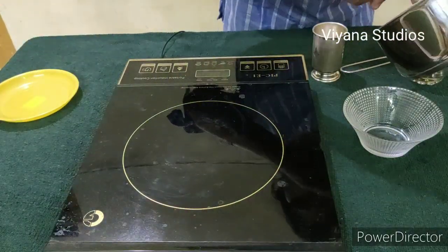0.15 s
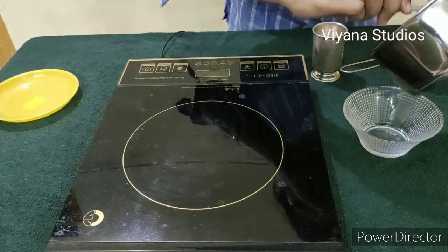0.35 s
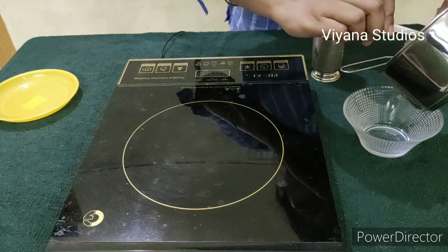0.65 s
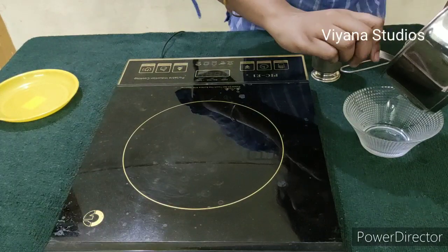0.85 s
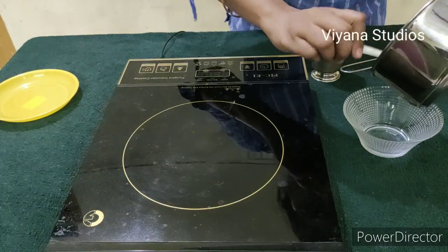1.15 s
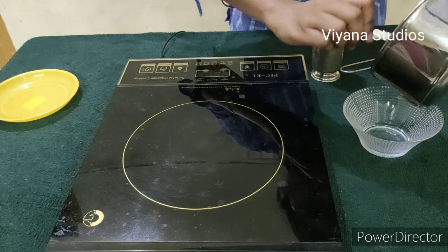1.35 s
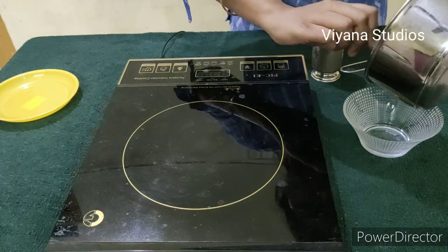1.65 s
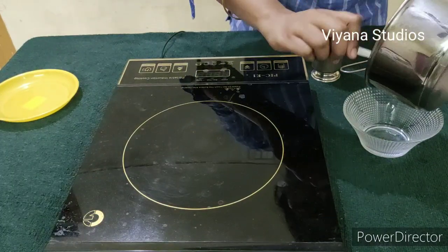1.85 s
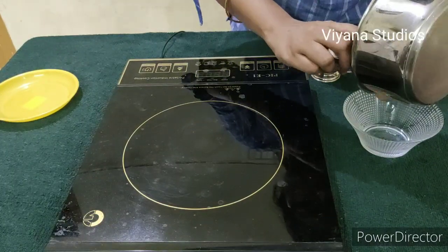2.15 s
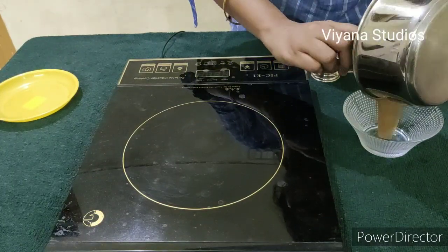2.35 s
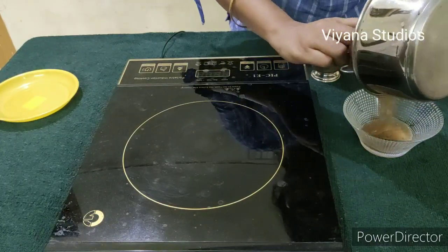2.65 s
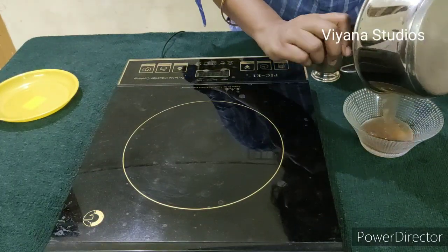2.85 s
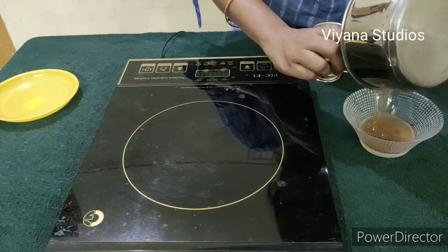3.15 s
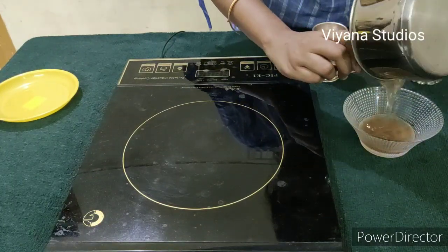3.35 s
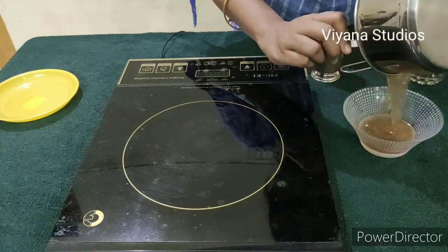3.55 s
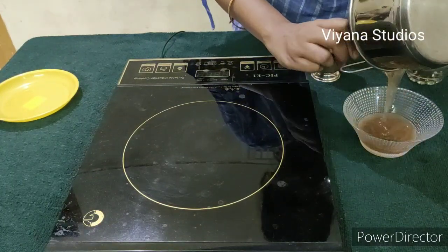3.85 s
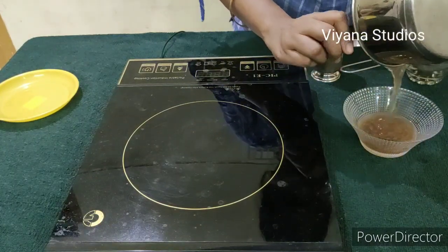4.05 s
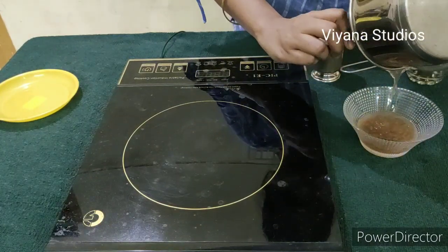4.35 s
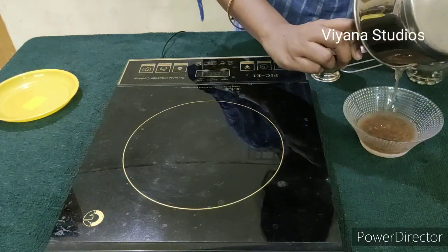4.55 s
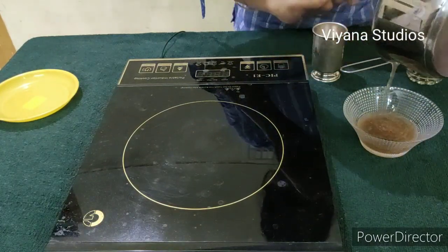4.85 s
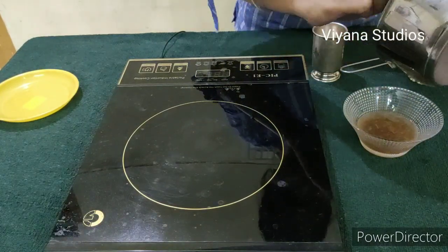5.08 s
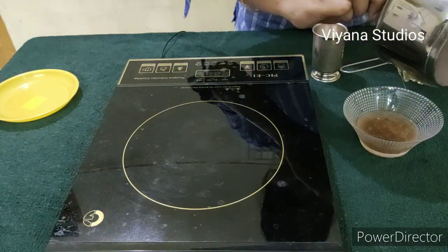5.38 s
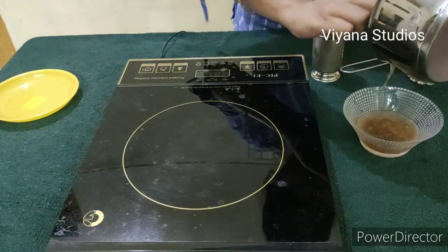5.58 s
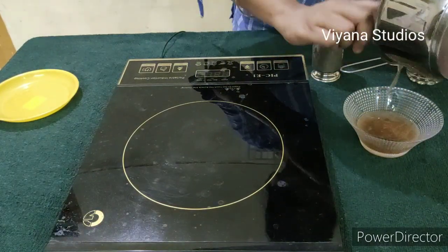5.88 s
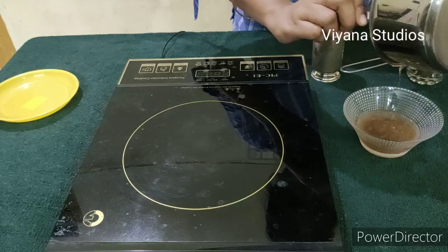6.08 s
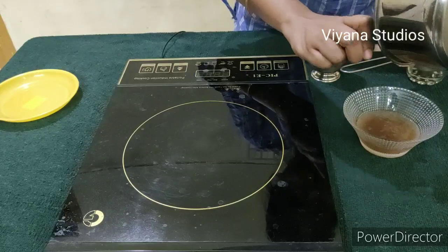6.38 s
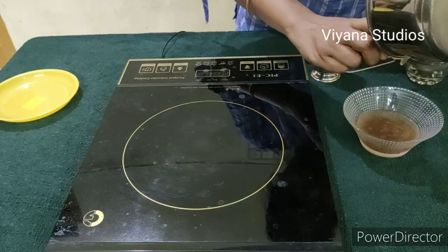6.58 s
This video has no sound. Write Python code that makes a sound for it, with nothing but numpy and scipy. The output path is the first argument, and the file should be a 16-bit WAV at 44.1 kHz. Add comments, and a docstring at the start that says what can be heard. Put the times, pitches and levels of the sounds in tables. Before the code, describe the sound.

A faint low fan hum and soft rush of air run throughout a small, reflective kitchen. Until 0.5 s there is only a very faint scrape and two tiny clinks. At 0.5 and 0.96 s a porridge-laden steel spoon lands with dull, damped clinks, each followed by a short gritty scrape; similar strokes come at 1.3, 1.7 and 2.1 s. At 2.4 s a clearer clink and two quick scrapes follow, then a tiny squeak at 2.8 and a clink with a sinking squeal at 3.1. From 3.5 to 5.1 s, light ticks, hollow pan-wall knocks and brief rasps alternate, strongest around 4.2 and 4.6. Bright, ringing clinks arrive at 5.55, 6.0, 6.33 and 6.65 s, with tighter scrapes, short squeaks near 1.7 kHz, soft low porridge shifts around 5.9-6.2, and a last knock at 6.5.

```python
"""A faint fan hum and a soft rush of air run throughout; a brief faint scrape and two quiet clinks come first.
Then a steel spoon scrapes thick porridge out of a tilted steel pan into a strainer, in a hard-walled kitchen.
Clinks and knocks are fading modes with a crack of noise; scrapes are uneven noise driven through the modes.
Squeals are gliding, roughened tones, ticks one dead resonance, and porridge shifts swells of low noise.
Porridge clinging to the spoon lowers and damps its ring."""
import sys
import numpy as np
from scipy import signal
from scipy.fft import rfft, irfft, next_fast_len
from scipy.io import wavfile
from scipy.ndimage import map_coordinates

SR = 44100
rng = np.random.default_rng(int(sys.argv[2]) if len(sys.argv) > 2 else 0)


def to_wav(sig):
    """Store sig (one row per channel, or 1-D mono) as 16-bit WAV at the path in sys.argv[1].

    Samples outside -1..1 are clipped; the rate is SR.
    """
    pcm = np.clip(np.atleast_2d(sig), -1, 1) * 32767
    pcm = np.round(pcm).astype(np.int16)
    wavfile.write(sys.argv[1], SR, pcm.T)  # frames by channels


N = 296352

# Kitchen air, relative spectrum: [pitch_hz, density_db_per_hz]
AIR_SPECTRUM = [(20, -0.5), (70, 4), (160, -3.5), (370, 2.5), (480, -3.5), (800, -4), (1200, -6.5),
                (2000, -5), (2600, -11), (4500, -25), (6500, -28.5), (8500, -42), (15000, -37.5)]
# Fan lines, level before a slight wobble: [pitch_hz, level_db]
FAN_LINES = [(64, -73.5), (124, -70), (199, -65.5), (262, -66)]
# Decay of the kitchen's diffuse sound: [pitch_hz, t60_s]
ROOM_DECAY = [(200, 0.96), (1000, 0.64), (3000, 0.48), (6000, 0.33), (14000, 0.47)]
# Soft, low noises of porridge and pan shifting, level before the swell: [start_s, length_s, centre_hz, level_db]
SHIFTS = [(5.857, 0.18, 560, -47.5), (6.09, 0.094, 128, -45.5), (6.159, 0.14, 65, -52)]
# Light ticks as the spoon is lifted, level before a common trim: [start_s, level_db]
TICKS = [(3.469, -32), (3.7918, -18.5), (4.151, -21), (5.027, -16)]
# Blows on the pan wall, level before colour and room:
# [start_s, level_db, brightness_db_per_octave, favoured_hz, freedom_to_ring_0_to_1]
KNOCKS = [(3.5274, -25, 2, 1310, 0.28), (3.845, -38, 4, 4080, 0.35), (4.1932, -20, 1.94, 1130, 0.52),
          (4.233, -32, -2.2, 3300, 0.13), (4.6362, -23.5, 2, 1050, 0.61), (5.103, -28, 0.7, 4550, 0.26),
          (6.5133, -22, -0.3, 3280, 0.15)]
# The spoon lands, level before colour and room; the last column scales its first bending mode:
# [start_s, level_db, brightness_db_per_octave, favoured_hz, porridge_0_to_1, first_mode_ratio]
CLINKS = [(0.185, -60, -4, 1700, 0.7, 1.2), (0.3456, -59, 5, 1740, 0.37, 1.1),
          (0.4978, -24.5, -3, 2780, 0.9, 1.125), (0.854, -67.5, 0, 8000, 0.4, .87),
          (0.962, -21.5, -0.16, 890, 0.99, 1), (1.3102, -22, -.5, 1340, 0.6, 0.93),
          (1.6785, -29, -2.5, 3900, 0.41, 0.99), (2.082, -31, -2, 4450, 0.5, 0.99),
          (2.3869, -23, 0.8, 3530, .12, 1.07), (2.49, -27.5, -4.5, 1300, 0.58, 1.01),
          (2.6306, -42, 1, 5100, 0.23, 0.94), (3.0719, -28, 2, 2020, .15, 1.02),
          (3.4904, -32, 2.5, 3280, 0, 1.12), (3.8146, -37, -0.5, 3620, 0.39, .97),
          (5.406, -43.5, 1.5, 4670, 0.1, 1.02), (5.5522, -21, -2.2, 4270, 0.07, 1.02),
          (6.0028, -21, -0.7, 5300, 0.09, 1.026), (6.184, -35.5, -3, 6640, .1, 1),
          (6.3339, -21.5, .7, 5420, 0.08, 1.01), (6.455, -38.5, 1.5, 4500, .2, 1.02),
          (6.6541, -21.5, 2.6, 2070, 0.01, 1.07)]
# The spoon's edge sticks and slips, level before pressure and room; the narrow, steady rows near 1750 Hz are
# the pan's own mode singing: # [start_s, length_s, start_hz, end_hz, level_db]
SQUEALS = [(0.213, 0.019, 4434, 4200, -59.5), (0.652, 0.043, 2110, 1974, -41),
           (1.761, 0.051, 1752, 1710, -43.5), (2.124, 0.17, 1109, 1216, -47.5),
           (2.808, 0.019, 2164, 2124, -31), (2.843, .066, 2120, 1830, -48), (3.098, 0.15, 2342, 1813, -42),
           (3.249, 0.036, 1714, 1646, -38), (3.843, 0.065, 2236, 1880, -38.5),
           (3.941, 0.014, 2710, 2884, -36.5), (5.718, 0.027, 2005, 1830, -35.5),
           (5.782, .08, 2072, 1820, -39), (6.008, 0.061, 1735, 1740, -29),
           (6.159, 0.029, 3694, 3613, -38.5), (6.183, 0.052, 1749, 1767, -36),
           (6.544, 0.083, 1762, 1760, -39.5)]
# Drags of the spoon, level before colour and room:
# [start_s, length_s, level_db, brightness_db_per_octave, favoured_hz]
SCRAPES = [(0.016, 0.081, -53, 0.1, 6600), (0.529, .175, -46, 0.3, 915), (0.98, 0.15, -43.5, 1.5, 3730),
           (1.341, .15, -45.5, -0.8, 2660), (1.714, 0.092, -46, -1, 4400), (2.095, 0.18, -44, -1.5, 1300),
           (2.401, 0.14, -42, .8, 2860), (2.539, 0.13, -48.5, -4, 4270), (2.746, 0.17, -52, 2, 5000),
           (3.1, 0.22, -48, 1.5, 4780), (3.572, .12, -46, 0.5, 980), (3.857, 0.14, -50.5, 5, 730),
           (4.276, 0.16, -45.5, 2.5, 1340), (4.741, .11, -46.5, 1, 1347), (5.129, 0.14, -54.5, -2.6, 3450),
           (5.619, 0.2, -41, -0.5, 4750), (5.83, 0.18, -56, -4, 700), (6.009, 0.044, -42.5, .5, 2460),
           (6.1, 0.064, -36.5, 4, 4900), (6.385, .1, -39, 2.1, 5780), (6.551, 0.093, -48, -2, 3300),
           (6.677, 0.058, -42.5, 6, 1800)]
# Modes of the clean, free spoon, relative levels: [pitch_hz, level_db, t60_s]
SPOON_MODES = [(951, -1.5, 0.025), (1095, -6, 0.025), (1746, 6.5, 0.75), (1914, -1, 0.22),
               (2037, 4.5, 0.044), (2330, -5, 0.1), (2806, -32.5, 0.087), (3414, -5, 0.178),
               (3615, 2, 0.096), (3671, 3, 0.035), (3780, -14.5, 0.13), (4110, -11, 0.053),
               (5000, -16.5, 0.022), (5420, -15.5, 0.028), (5885, -1.5, 0.066), (5848, -9, 0.11),
               (5700, -5.5, 0.24), (7030, -29, 0.17), (6450, -11, 0.13), (6800, -44.5, 0.066),
               (8940, -40, 0.14), (10270, -39.5, 0.03), (10450, -48, 0.067), (10900, -12, 0.12),
               (12530, -22, 0.21), (14800, -33.5, 0.018)]
# Modes of the free pan, relative levels: [pitch_hz, level_db, t60_s]
PAN_MODES = [(698, -23, 0.033), (796.3, -17.5, 0.25), (912, -19, 0.079), (1180, -34, 0.081),
             (1282, -9.5, 0.13), (1648, -10, 0.37), (1747, 2.5, 1), (1954, 6, 0.16), (2203, 0.5, 0.099),
             (2309, -8.5, 1), (2323, -1, 0.09), (2890, -9.5, 1), (2786, -9.5, 0.19), (3090, -11.5, 0.31),
             (3660, -8, 0.16), (3783, -17.5, 0.05), (4054, -18.5, 0.208), (4800, -25.5, 0.368),
             (5760, -10.5, 0.096), (6261, -37, .16), (7070, -16.5, 0.42), (6630, -11.5, 0.074),
             (7490, -19.5, 0.15), (9600, -46, 0.096), (12800, -42.5, 0.26)]
# Noise of metal on metal, relative spectrum: [pitch_hz, density_db_per_hz]
CONTACT_SPECTRUM = [(100, -34), (350, -21), (600, -12), (900, 0), (2000, 0), (3500, -2), (7000, -6),
                    (8500, -15), (12000, -20), (15500, -25)]
# Edges of the five bands in which contacts are balanced: [edge_hz]
BAND_EDGES = [500, 1400, 2700, 4600, 8000, 16000]
# Balance at an average point of contact, one value per band: [level_db]
CLINK_COLOUR = [-14, -8, -4.5, -6, -32]
KNOCK_COLOUR = [-6.5, 0.5, -11, -16, -32]
SCRAPE_COLOUR = [-10.5, -.7, -5, -11, -30]

TOP_HZ = 15450  # the microphone's band limit
FAVOUR_DB, FAVOUR_OCTAVES = 8, 0.45  # lift and width of the zone that the point of contact favours
PIVOT_HZ, BRIGHT_TOP_HZ = 2750, 5750  # brightness tilts the bands about the pivot, up to the top
PORRIDGE_SAG = .11  # share by which a full load lowers the spoon's upper modes
GRIP_LOSS, PORRIDGE_LOSS = 0.66, 7.4  # relative damping of the spoon by the hand, and by a full load
PRESS_LOSS, FIRM_DB = 2.8, -17  # a firm blow stays pressed to the metal: damping added at this level
SMEAR_HZ, PORRIDGE_SMEAR_HZ = 27, 171.5  # widening of the dragged spoon's modes: bare, plus a full load
EASE_DB_PER_S = 43  # the hand presses hardest at first and eases off
SQUEAL_WIDTH_HZ, WIDTH_PER_GLIDE = 5.5, 0.72  # blur of a steady squeal, Hz added per Hz of glide
SQUEAL_OCTAVE_DB = -16  # second partial


def amp(db):
    """Decibels to gain."""
    return 10 ** (np.asarray(db) / 20)


def unit(x):
    """Scaled to rms 1."""
    return x / np.sqrt(np.mean(x ** 2) + 1e-20)


def along(points, hz):
    """(Hz, value) points joined on a log frequency axis."""
    point_hz, value = np.transpose(points)
    return np.interp(np.log(hz + 1), np.log(point_hz + 1), value)


def filtered(x, response):
    """x shaped by a response of frequency."""
    size = next_fast_len(len(x) + SR // 10)
    spectrum = rfft(x, size) * response(np.fft.rfftfreq(size, 1 / SR))
    return irfft(spectrum, size)[:len(x)]


def noise(spectrum, n):
    """Coloured noise of rms 1."""
    return unit(filtered(rng.standard_normal(n), lambda hz: amp(along(spectrum, hz))))


def wobble(rate, n):
    """A smooth random curve with rate knots a second."""
    return map_coordinates(rng.standard_normal(size=2048), [np.arange(n) * rate / SR], mode="wrap")


def add(track, start_s, x):
    """Mix x into the track from start_s."""
    i = max(round(start_s * SR), 0)
    track[i:i + len(x)] += x[:max(len(track) - i, 0)]


def in_kitchen(x, wet_db):
    """Direct sound plus the diffuse answer of the walls, which swells in and dies at a rate set by pitch."""
    hz, t, grains = signal.stft(rng.standard_normal(size=26000), SR, nperseg=256)
    decay = amp(-60 * t / along(ROOM_DECAY, hz)[:, None])
    build_up = 1 - np.exp(-t / 0.004)
    tail = signal.istft(grains * decay * build_up, SR, nperseg=256)[1]
    response = amp(wet_db) * tail / np.linalg.norm(tail)
    response[0] += 1  # direct sound
    return signal.fftconvolve(x, response)


def band_centres(edges):
    """Geometric middle of each band."""
    return np.sqrt(edges[:-1] * edges[1:])


def voiced(x, levels_db, n):
    """The point of contact sets how strongly each band sounds over the first n samples."""
    edges = np.array(BAND_EDGES[:len(levels_db) + 1])
    for _ in range(2):  # the second pass tightens the balance
        power = 2 * np.abs(rfft(x[:n]) / n) ** 2
        band_power = np.histogram(np.fft.rfftfreq(n, 1 / SR), edges, weights=power)[0]
        lift = np.c_[band_centres(edges), levels_db - 10 * np.log10(band_power + 1e-20)]
        x = filtered(x, lambda hz: amp(along(lift, hz)))
    return x


def colour(average_db, level_db, bright_db, favoured_hz):
    """Band levels of one contact: a harder edge tilts them upwards, and the spot touched lifts one zone."""
    centres = band_centres(np.array(BAND_EDGES))
    tilt = bright_db * np.log2(np.minimum(centres, BRIGHT_TOP_HZ) / PIVOT_HZ)
    zone = FAVOUR_DB * np.exp(-.5 * (np.log2(centres / favoured_hz) / FAVOUR_OCTAVES) ** 2)
    return level_db + np.array(average_db) + tilt + zone


def blow(modes, ring, levels_db, held_t60, crack_db, crack_t60, rise):
    """A short crack of contact and the fading modes, at new strengths for each blow."""
    t = np.arange(SR // 2) / SR
    hz, db, t60 = np.transpose(modes)[:, :, None]
    scatter, phase = rng.standard_normal((2, len(modes), 1))
    # whatever holds the metal adds the same loss to every mode
    loss = 1 / t60 + max(1 / ring - 1, 0) / held_t60
    tones = amp(db + 2 * scatter - 60 * t * loss) * np.sin(2 * np.pi * (hz * t + phase))
    crack = amp(crack_db - 60 * t / crack_t60) * noise(CONTACT_SPECTRUM, len(t))
    struck = (tones.sum(0) + crack) * (1 - np.exp(-t / rise))
    lead_in = SR // 500  # 2 ms of silence
    return voiced(np.pad(struck, (lead_in, 0)), levels_db, SR // 50)


def loaded_spoon(porridge, first):
    """Porridge and grip shift the spoon's bending modes; the hollow tone near 1 kHz stays."""
    hz, db, t60 = np.transpose(SPOON_MODES)
    upper = 1 - PORRIDGE_SAG * porridge
    shift = np.interp(hz, [1200, 1750, 2100, 3000], [1, first, 1, upper])
    return np.c_[hz * shift, db, t60]


def resonances(modes, hz, damping_hz, treble_db):
    """Response of a rubbed body: the pressing edge widens its modes and favours some by chance."""
    total = 0
    for k, (centre, db, t60) in enumerate(modes):
        width = np.log(1000) / np.pi / t60 + damping_hz
        favour_db = 3 * rng.standard_normal()
        gain = amp(db + favour_db + treble_db * centre / TOP_HZ)
        sign = (-1) ** k  # neighbouring modes move in opposition
        total = total + sign * gain * 1j * hz * width / (centre ** 2 - hz ** 2 + 1j * hz * width)
    return total


def stroke(t, length, edge):
    """Pressure that comes on, holds for the length of the stroke and lets go."""
    return np.clip(t / edge, 0, 1) * np.clip((length + edge - t) / edge, 0, 1)


def background():
    """Soft rush of air as coloured noise, and a fan's lines as slightly unsteady sines."""
    t = np.arange(N) / SR
    hum = 0
    for hz, db in FAN_LINES:
        level = amp(db + 0.94 * wobble(4.2, N)) * np.sqrt(2)  # rms to peak
        hum = hum + level * np.sin(2 * np.pi * hz * t + 0.67 * wobble(6.1, N))
    air = amp(-54.5 + 0.26 * wobble(4.07, N)) * noise(AIR_SPECTRUM, N)
    return hum + air


def shifts(octaves=0.77):
    """Thick porridge slides and the pan moves in the hand: soft swells of low noise."""
    out = np.zeros(N)
    for start_s, length, centre_hz, db in SHIFTS:
        band = lambda hz: np.exp(-.5 * (np.log2((hz + 1) / centre_hz) / octaves) ** 2)
        swell = np.hanning(int(length * SR))
        rumble = unit(filtered(rng.standard_normal(SR), band))[:len(swell)]
        add(out, start_s, amp(db) * swell * rumble)
    return out


def ticks(tick_hz=2520, t60=0.011):
    """A light touch of the spoon: one dead resonance with a little noise about it."""
    out, t = np.zeros(N), np.arange(SR // 20) / SR
    for start_s, db in TICKS:
        grit = noise([(600, -12), (2500, 3.0), (3800, -4), (5000, -40.0)], len(t))
        touch = np.sin(2 * np.pi * tick_hz * t) + 0.33 * grit
        fade = amp(db - 7 - 60 * t / t60) * (1 - np.exp(-t / 0.00047))
        add(out, start_s, in_kitchen(fade * touch, wet_db=-29))
    return out


def knocks():
    """The thin pan wall rings like a dull bell."""
    out = np.zeros(N)
    for start_s, db, bright_db, favoured_hz, ring in KNOCKS:
        levels_db = colour(KNOCK_COLOUR, db, bright_db, favoured_hz)
        hit = blow(PAN_MODES, ring, levels_db, held_t60=0.26,
                   crack_db=-5.5, crack_t60=0.058 * np.sqrt(ring), rise=0.00046)
        add(out, start_s - .002, in_kitchen(hit, wet_db=-6.5))
    return out


def clinks():
    """The spoon lands; the more porridge it carries, the lower, deader and noisier it sounds."""
    out = np.zeros(N)
    for start_s, db, bright_db, favoured_hz, porridge, first in CLINKS:
        press_loss = PRESS_LOSS * amp(db - FIRM_DB)
        ring = 1 / (1 + GRIP_LOSS + PORRIDGE_LOSS * max(porridge, 0) + press_loss)
        levels_db = colour(CLINK_COLOUR, db, bright_db, favoured_hz)
        hit = blow(loaded_spoon(porridge, first), ring, levels_db, held_t60=0.22,
                   crack_db=4.0 - 10 * ring, crack_t60=0.023, rise=0.0012)
        add(out, start_s - .002, in_kitchen(hit, wet_db=-8.5))
    return out


def squeals(edge=.008):
    """Stick-slip locks into a tone that mostly sinks as the spoon travels; a longer glide is rougher. The pan's
    own mode near 1750 Hz sings as a narrow, steady tone."""
    out, t = np.zeros(N), np.arange(SR // 4) / SR
    partials_db = [0, SQUEAL_OCTAVE_DB, SQUEAL_OCTAVE_DB - 20.5, SQUEAL_OCTAVE_DB - 26.5]
    for start_s, length, start_hz, end_hz, db in SQUEALS:
        glide_hz = np.interp(t, [0, length], [start_hz, end_hz])
        phase = 2 * np.pi * np.cumsum(glide_hz) / SR
        width_hz = SQUEAL_WIDTH_HZ + WIDTH_PER_GLIDE * abs(end_hz - start_hz)
        tone = 0
        for k, partial_db in enumerate(partials_db, 1):
            # uneven slips blur each overtone more than the one below
            blur = k * width_hz
            jitter = wobble(2 * blur, len(t)) + 1j * wobble(2 * blur, len(t))
            rough = 1 + jitter * blur / 60
            tone = tone + amp(partial_db) * unit(np.real(rough * np.exp(1j * k * phase)))
        squeal = amp(db) * unit(tone) * stroke(t, length, edge)
        add(out, start_s - edge / 2, in_kitchen(squeal, wet_db=-12))
    return out


def scrapes(edge=.024, grit_db=3.5, judder_db=-2.04, sway_db=1.5, count=4):
    """Tiny uneven slips of the edge drive the modes of both spoon and pan."""
    out, t = np.zeros(N), np.arange(SR // 3) / SR
    landed = np.transpose(CLINKS)[0]
    for start_s, length, db, bright_db, favoured_hz in SCRAPES:
        # the spoon keeps the load with which it last landed
        *_, porridge, first = CLINKS[max(np.searchsorted(landed, start_s) - 1, 0)]
        spoon = loaded_spoon(porridge, first)
        # the porridge that lowers the modes also widens them
        smear_hz = SMEAR_HZ + PORRIDGE_SMEAR_HZ * max(porridge, 0)
        uneven_db = grit_db * wobble(900, len(t)) + judder_db * wobble(115, len(t))
        uneven_db = uneven_db + sway_db * wobble(40, len(t))
        pressure = amp(uneven_db - EASE_DB_PER_S * t) * stroke(t, length, edge)
        slips = noise(CONTACT_SPECTRUM, len(t)) * pressure
        # just after a knock the spoon still rubs the wall itself
        on_wall = any(0 < start_s - knock[0] < 1 / 4 for knock in KNOCKS)
        wall_db = 8 if on_wall else -11

        def body(hz):
            """Spoon and pan modes, with a little of the bare contact noise."""
            spoon_part = resonances(spoon, hz, damping_hz=smear_hz, treble_db=-1.5)
            pan_part = resonances(PAN_MODES, hz, damping_hz=38.3, treble_db=10.0)
            return spoon_part + amp(wall_db) * pan_part + amp(-26)

        # as the edge travels, one mix of modes gives way to the next
        travel = np.clip(t / (length + edge), 0, 1) * (count - 1)
        rasp = 0
        for k in range(count):
            fade = np.cos(np.pi / 2 * np.clip(travel - k, -1, 1))
            rasp = rasp + filtered(slips * fade, body)
        levels_db = colour(SCRAPE_COLOUR, db, bright_db, favoured_hz)
        rasp = voiced(rasp, levels_db, int(min(length + edge, t[-1]) * SR))
        add(out, start_s - edge / 2, in_kitchen(rasp, wet_db=-11.5))
    return out


def scene():
    """Spoon, pan and porridge over the quiet of the kitchen."""
    quiet = background() + shifts()
    touches = ticks() + knocks() + clinks()
    drags = squeals() + scrapes()
    return (quiet + touches + drags)[None]


def record(dry):
    """The microphone keeps nothing above its band limit."""
    return np.array([filtered(channel, lambda hz: hz < TOP_HZ) for channel in dry])


dry = scene()
out = record(dry)
to_wav(out)
```